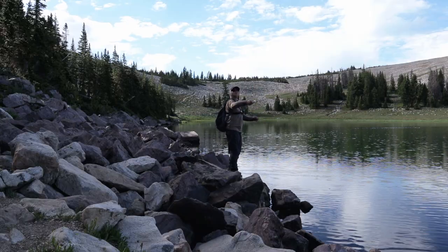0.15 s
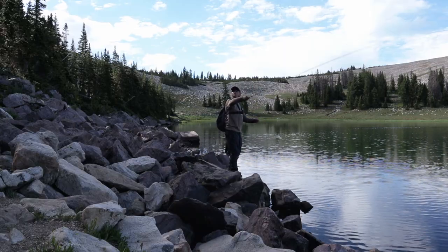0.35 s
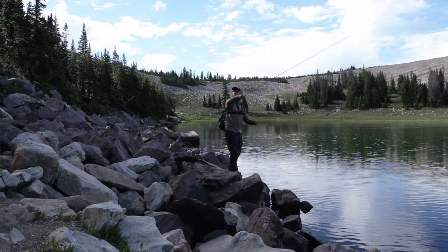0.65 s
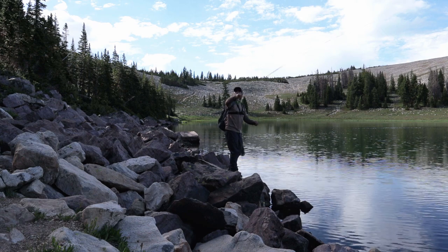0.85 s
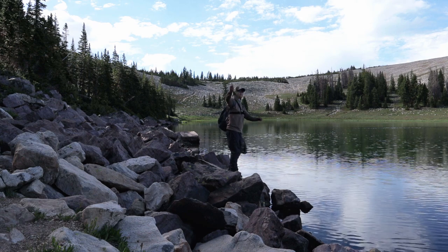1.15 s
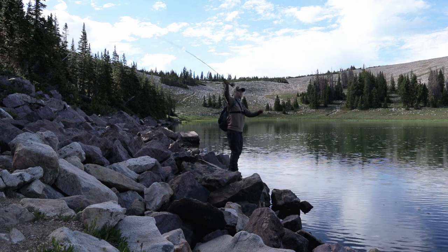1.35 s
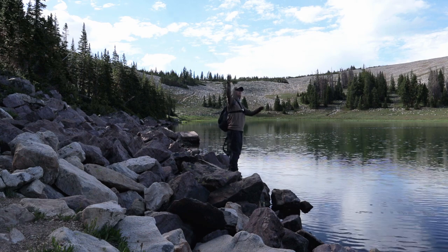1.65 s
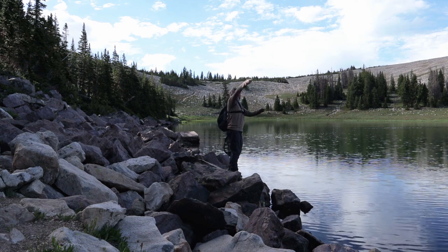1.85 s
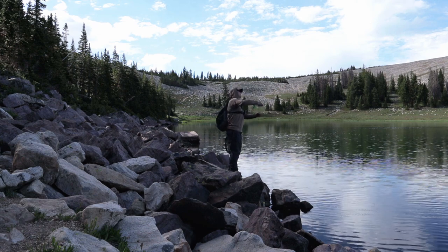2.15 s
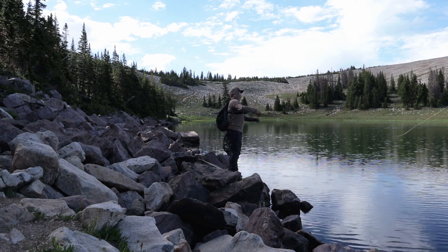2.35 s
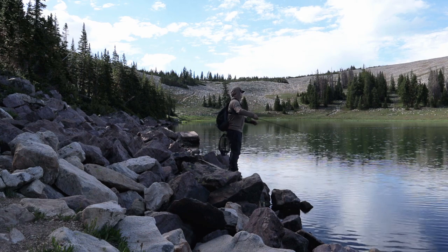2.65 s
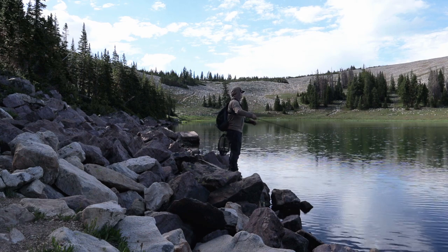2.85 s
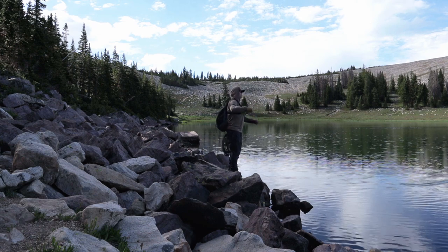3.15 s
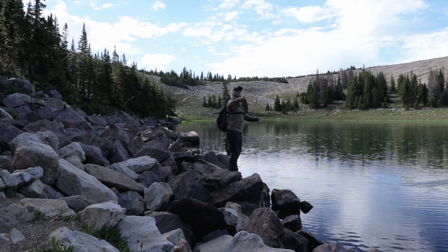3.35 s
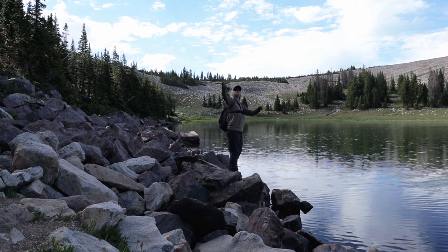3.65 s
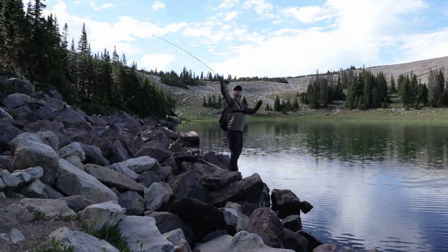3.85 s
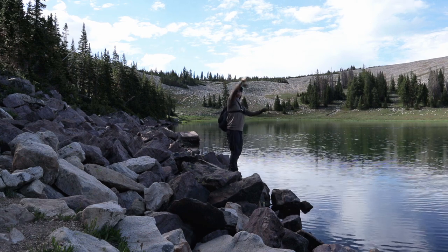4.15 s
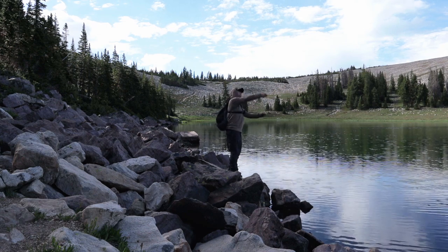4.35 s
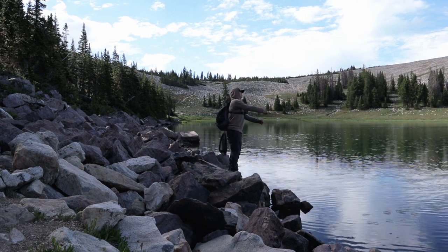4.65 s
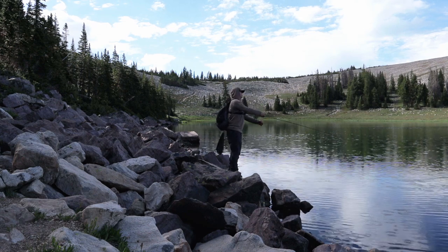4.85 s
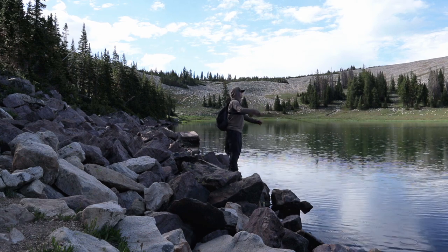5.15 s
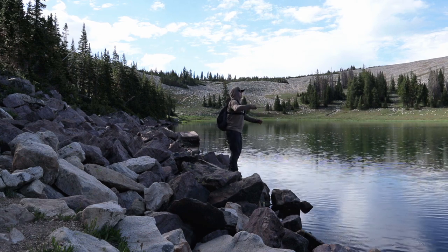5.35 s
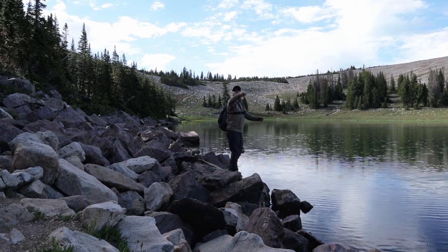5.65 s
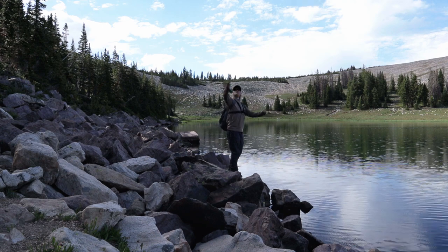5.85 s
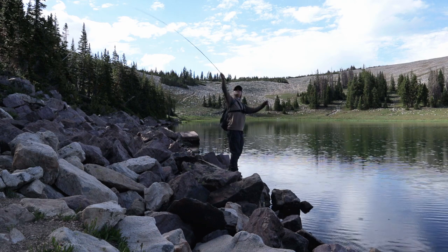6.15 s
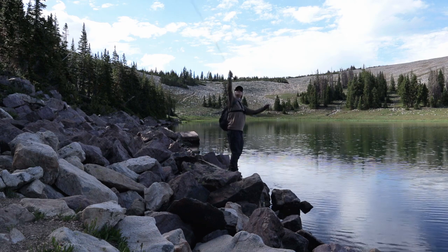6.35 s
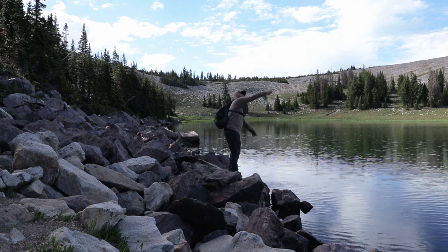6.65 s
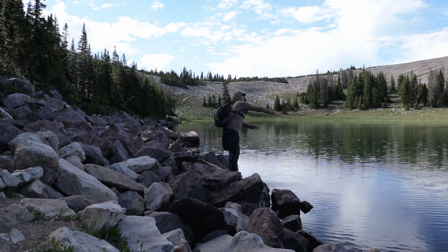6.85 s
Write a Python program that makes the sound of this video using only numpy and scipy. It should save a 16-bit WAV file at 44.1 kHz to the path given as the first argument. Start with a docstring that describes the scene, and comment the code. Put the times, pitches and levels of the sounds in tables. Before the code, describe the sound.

A close, dry outdoor sound of fly casting beside a still lake, with a low steady hush and faint wind buffets. A bird trills faintly until 0.4 s as a swish and soft line hiss pass, with tiny plops. From 1.0 to 1.4 s the ribbed line zips with a rising, then falling whine; a hissy swish and rattling ticks follow around 1.5-1.7. Ticks at 1.9-2.1 lead into two wavering zips until 2.6, then sparse ticks and small plops. A low knock at 3.3 starts a loud, bright zip climbing until 3.7, with a short tail. From 4.3 to 5.2 a swish carries thin, high, fluttering zips that slide downward. A rising zip at 5.6-5.85 precedes a sharp, jittery one at 5.95-6.15. Crisp slaps crackle at 6.2-6.4, then a strong final whoosh and rushing line hiss at 6.8-7.0.

```python
"""Ribbed fly line zips through a rod's guides as it is hauled: gliding tones with harmonics, over friction
hiss. The line ticks on the rod (damped sines); the rod swishes (shaped noise, fuzzy gliding tones). Light wind
buffets the microphone (gusty low noise); water plops among rocks and one low knock (rising damped sines) sound
over the steady hush of lake and forest (shaped noise); a bird trills faintly (whistles)."""
import sys
import numpy as np
from scipy import signal
from scipy.fft import rfft, irfft, next_fast_len
from scipy.io import wavfile
from scipy.ndimage import uniform_filter1d, map_coordinates

SR = 44100
rng = np.random.default_rng(int(sys.argv[2]) if len(sys.argv) > 2 else 0)


def put_to_file(sound):
    """Save the sound as 16-bit audio at rate SR, in the file named by the first command-line argument."""
    columns = np.atleast_2d(sound).T  # one column per channel
    safe = np.clip(columns, -1, 1)
    whole_steps = np.round(safe * 32767)
    wavfile.write(sys.argv[1], SR, whole_steps.astype(np.int16))


N = 309444


def amp(db):
    """Gain of a level in dB."""
    return 10 ** (np.asarray(db) / 20)


def unit(x):
    """x at rms 1."""
    return x / np.sqrt(np.mean(x ** 2) + 1e-20)


def wobble(rate_hz, size=N):
    """Smooth random curve with rate_hz knots a second."""
    knots = rng.standard_normal(size // 32 + 4)
    return map_coordinates(knots, [np.arange(size) * rate_hz / SR])


def filtered(x, response):
    """x times a response of frequency in Hz."""
    m = next_fast_len(N + 8192)
    return irfft(rfft(x, m) * response(np.fft.rfftfreq(m, 1 / SR)), m)[..., :N]


def noise(spectrum, patchy_db, grit_db):
    """Coloured noise of rms 1 with fast lumps and time-frequency patches of random gain."""
    gritty = rng.standard_normal(N) * amp(grit_db * wobble(400))
    z = signal.stft(gritty, nperseg=512)[2]
    field = uniform_filter1d(rng.standard_normal(z.shape), 5, 0)
    field = uniform_filter1d(field, 6, 1)
    x = signal.istft(z * amp(patchy_db * unit(field)), nperseg=512)[1][:N]
    f, db = np.transpose(spectrum)
    return unit(filtered(x, lambda hz: amp(np.interp(np.log(hz + 1), np.log(f + 1), db, -120, -120))))


def swells(events, base_db):
    """Gain over time: bell-shaped swells adding their power to a base level."""
    s, half_s, db = np.transpose(events)[:, :, None]
    t = np.arange(0, N, 32) / SR
    power = amp(db) ** 2 * np.exp(-((t - s) / half_s) ** 2 * 2)
    return np.repeat(np.sqrt(power.sum(0) + amp(base_db) ** 2), 32)[:N]


def pings(events, cycles, rise, crack, onset):
    """Damped sines gliding up, with a noise share; onset and decay constants are in cycles."""
    out, t = np.zeros(N + SR), np.arange(SR // 10) / SR
    for s, db, hz in events:
        ring = np.sin(2 * np.pi * hz * t * (1 + rise * hz * t))
        ring = ring + crack * rng.standard_normal(len(t))
        shape = ring * np.exp(-t * hz / cycles) * (1 - np.exp(-t * hz / onset))
        out[round(s * SR):][:len(t)] += amp(db) * shape / np.abs(shape).max()
    return out[:N]


def wind():
    """Lumpy pressure on the microphone: deep buffets and a quicker flutter, each in gusts."""
    # Relative spectra. Each row: frequency in Hz, density in dB per Hz.
    buffet_spectrum = [(8.8, -79), (15, 3.5), (35, 0), (120, -19), (160, -22.5), (260, -120)]
    flutter_spectrum = [(65, -31), (110, -8.5), (157, 9), (225, 3), (340, -3), (500, -6), (650, -10),
                        (1100, -120)]
    # Gusts. Each row: peak in seconds, half length in seconds, level in dB.
    buffet_gusts = [(0, 0.3, -72), (.55, 0.18, -59.5), (.75, 0.022, -65), (.925, 0.023, -40),
                    (1.05, 0.15, -60), (1.43, 0.071, -45.5), (1.65, .08, -61.5), (2.04, 0.053, -53.5),
                    (3.13, 0.024, -60), (2.4, 0.12, -79), (4.0, 0.082, -62), (4.23, 0.017, -53.5),
                    (4.36, .05, -58), (5.92, 0.075, -57), (6.0, .06, -43), (6.12, 0.11, -56.5),
                    (6.3, 0.12, -58), (6.77, 0.084, -47), (6.92, 0.071, -53)]
    flutter_gusts = [(.265, 0.019, -57.5), (.35, 0.05, -57.5), (.5, 0.31, -63.5), (.72, 0.055, -53),
                     (.925, 0.017, -59.5), (1.46, 0.087, -63.5), (1.65, 0.075, -56.5), (2.04, 0.15, -69),
                     (3.36, .05, -60), (3.7, 0.072, -73), (3.95, 0.059, -67), (4.38, 0.053, -58.5),
                     (4.55, 0.18, -66), (5.62, 0.045, -59.5), (5.93, 0.018, -71), (6.28, 0.23, -64),
                     (6.88, 0.25, -58)]
    lull_db, stir_db = -75.5, -75.5  # buffet and flutter between gusts
    buffet = unit(amp(4.2 * wobble(9.8)) * noise(buffet_spectrum, patchy_db=-2.5, grit_db=-1.0))
    flutter = unit(amp(3.5 * wobble(25)) * noise(flutter_spectrum, patchy_db=2.0, grit_db=3.0))
    return swells(buffet_gusts, lull_db) * buffet + swells(flutter_gusts, stir_db) * flutter


def lake():
    """Steady hush of lake and forest as shaped noise; plops and a knock as rising damped sines."""
    # Relative spectrum of the hush. Each row: frequency in Hz, density in dB per Hz.
    hush_spectrum = [(59, -26), (100, -13), (218, 7.5), (564, -25), (758, 8), (1130, -18), (1400, -0.5),
                     (3390, -29), (5870, 5), (8410, -33), (9740, -18), (13400, -24), (15500, -80)]
    # Plops among the rocks, and a low knock near 3.33 s.
    # Each row: start in seconds, peak in dB, starting pitch in Hz.
    plops_and_knock = [(0.24, -48, 232), (0.278, -54.5, 270), (0.709, -49, 220), (2.78, -55.5, 1250),
                       (2.936, -59.5, 1080), (3.144, -62, 680), (3.331, -39, 568), (3.338, -40.5, 770),
                       (3.362, -45.5, 740), (4.572, -52, 225), (6.451, -51, 1420)]
    hush_db = -74.5
    hush = amp(hush_db) * noise(hush_spectrum, patchy_db=1.4, grit_db=.6)
    return hush + pings(plops_and_knock, cycles=3.7, rise=0.0032, crack=0.0082, onset=0.35)


def swish():
    """Broad turbulence of the rod, plus vortices shed by the rod itself: fuzzy tones that glide."""
    # Vortex tones. Each row: start, end in seconds, level in dB before gain and fuzz, from Hz, to Hz.
    shedding = [(.36, 0.53, -57, 1600, 1306), (3.827, 3.949, -59, 1320, 1980),
                (3.98, 4.113, -61.5, 1900, 2260), (6.147, 6.268, -56, 1400, 2190),
                (6.305, 6.455, -57, 1787, 1726), (6.837, 7.036, -52, 2110, 1890)]
    # Rod strokes. Each row: fastest at seconds, half length in seconds, level in dB before gain.
    strokes = [(.45, 0.21, -61), (.28, 0.036, -67.5), (.67, 0.069, -62.5), (.92, 0.25, -70),
               (1.6, 0.16, -61), (2.0, .15, -62.5), (2.35, 0.27, -68), (3.36, 0.056, -59.5),
               (3.7, 0.58, -67.5), (4.4, 0.09, -60), (4.64, 0.12, -57.5), (5.1, 0.63, -69.5),
               (5.8, 0.1, -64), (6.25, 0.68, -68), (6.86, 0.19, -55.5)]
    # Relative spectrum of the turbulence. Each row: frequency in Hz, density in dB per Hz.
    air_spectrum = [(210, -1.5), (350, -5), (656, -5), (746, -1), (2490, -1), (3850, -5.5), (6110, -12.5),
                    (7500, -24), (9750, -46), (16500, -120)]
    calm_db = -78.5  # between strokes, before gain
    rod_gain_db, shed_gain_db = 4.5, 2
    t, fuzz, tone = np.arange(N) / SR, unit(wobble(1100)), 0
    for start, end, db, from_hz, to_hz in shedding:
        u = np.clip((t - start) / (end - start), 0, 1)
        turns = np.cumsum(from_hz + (to_hz - from_hz) * u) / SR
        tone = tone + amp(db + shed_gain_db) * np.sin(np.pi * u) ** 0.23 * np.sin(2 * np.pi * turns)
    rod = swells(strokes, calm_db) * noise(air_spectrum, patchy_db=3.0, grit_db=2.0)
    return amp(rod_gain_db) * rod + fuzz * tone


def rubbing():
    """Gritty friction noise ringing in the small steel guides: each slide rises, drifts and dies."""
    # Slides of the line. Each row: start in seconds, end in seconds, hiss at start and at end in dB
    # before grip, rise in seconds, bright edge in dB against hiss.
    slides = [(0.295, 0.7, -44.5, -62.5, 0.24, -16), (0.822, .89, -64.5, -74, .01, -36),
              (0.97, 1.255, -52.5, -48.5, 0.024, -24), (1.237, 1.396, -50, -53, 0.028, -15),
              (1.484, 1.643, -36.5, -51.5, 0.13, -12.5), (1.879, 1.948, -47.5, -52.5, 0.0096, -8.5),
              (1.962, 2.037, -48, -56, 0.015, -4.5), (2.018, 2.279, -48, -47.5, 0.049, -10.5),
              (2.27, 2.642, -49.5, -53, .03, -16), (3.349, 3.488, -48, -42, 0.056, -25),
              (3.443, 3.693, -47.5, -46.5, 0.013, -5), (3.704, 3.87, -54.5, -52.5, 0.018, -13),
              (3.855, 4.105, -63, -62, .02, -11), (4.23, 4.64, -60, -50, 0.06, -10.5),
              (4.634, 4.826, -48.5, -57, 0.026, -10.5), (4.822, 5.316, -50, -56, 0.012, -16.5),
              (5.464, 5.73, -57.5, -45, 0.072, -31), (5.656, 5.854, -49, -42, 0.018, -16.5),
              (5.939, 6.164, -48, -48.5, 0.024, -15.5), (6.163, 6.435, -56, -65, 0.038, -13),
              (6.427, 6.81, -65.5, -62.5, 0.023, -12.5), (6.796, 7.044, -36, -54.5, 0.18, -9.5)]
    # Relative spectra. Each row: frequency in Hz, density in dB per Hz.
    hiss_spectrum = [(1180, -25), (2000, -19.5), (4070, -4.5), (4390, -7.5), (4680, -4.5), (5900, -1.5),
                     (6290, -3), (7360, -16.5), (9000, -29), (11700, -75), (19800, -120)]
    edge_spectrum = [(4590, -33.5), (7800, -15.5), (8880, -20), (9960, -20.5), (11400, -39), (14300, -41),
                     (15500, -55)]
    ring_spectrum = [(3600, -43), (4500, -28.5), (5300, 1), (6000, 0), (6700, 8.5), (7200, -26),
                     (8000, -71)]
    lift_s, slack_db = 0.041, -73  # dying time scale as the line lifts; slack-line hiss before grip
    ring_db, ring_grows = -43.5, 2.3  # ringing equals hiss at this level and grows faster, dB per dB
    t = np.arange(N) / SR
    hiss_power, edge_power = amp(2 * slack_db), amp(2 * (slack_db - 12.5))
    for start, end, from_db, to_db, rise_s, edge_db in slides:
        rising = np.clip(1 - (t - start) / rise_s, 0, 9)
        dying = np.clip((t - end) / lift_s, 0, 9) ** 0.82
        level_db = np.interp(t, [start, end], [from_db, to_db]) - 25 * (rising + dying)
        power = amp(2 * level_db)
        hiss_power = hiss_power + power
        edge_power = edge_power + power * amp(2 * edge_db)
    grip = amp(1.5 * wobble(40) + 1.2 * wobble(12))
    ring_gain = amp(ring_db) * (hiss_power / amp(2 * ring_db)) ** (ring_grows / 2)
    ring = ring_gain * noise(ring_spectrum, patchy_db=0.5, grit_db=3)
    hiss = np.sqrt(hiss_power) * noise(hiss_spectrum, patchy_db=2, grit_db=2.5)
    edge = np.sqrt(edge_power) * noise(edge_spectrum, patchy_db=2, grit_db=2.5)
    return grip * (ring + hiss + edge)


def bird():
    """Trill: each note is a falling whistle, then a lower, nearly steady one."""
    # Trill notes. Each row: start in seconds, level in dB.
    trill = [(.004, -66), (.082, -64.5), (0.16, -64), (0.241, -63.5), (.322, -63)]
    # Parts of a note. Each row: start in seconds, length in seconds, from Hz, to Hz.
    note_parts = [(0, 0.017, 5050, 4280), (0.02, 0.028, 3820, 3650)]
    out = np.zeros(N)
    for s, db in trill:
        for start, length_s, from_hz, to_hz in note_parts:
            u = np.arange(round(length_s * SR)) / (length_s * SR)
            tone = np.sin(2 * np.pi * np.cumsum(from_hz + (to_hz - from_hz) * u) / SR)
            out[round((s + start) * SR):][:len(u)] += amp(db) * np.sin(np.pi * u) ** 0.71 * tone
    return out


def ticks():
    """Dry slaps of the line on the rod, each with a short scattered answer from the rocks."""
    # Slaps. Each row: start in seconds, peak in dB before filter and gain, pitch in Hz.
    single_slaps = [(0.237, -54, 1798), (0.2828, -57, 2540), (0.3154, -50, 2760), (0.3523, -37.5, 2620),
                    (0.571, -51, 4970), (0.675, -61, 3000), (0.7028, -50, 4500), (0.833, -52, 4660),
                    (1.6598, -27, 5340), (1.8946, -28, 5000), (1.9297, -30, 4100), (1.9394, -35, 4700),
                    (1.9694, -37, 6100), (1.9818, -44, 6500), (2.011, -35, 5160), (2.0936, -47, 6430),
                    (2.662, -39.5, 5900), (2.6888, -47, 6500), (2.7322, -47, 6770), (2.7493, -33.5, 5800),
                    (2.8363, -46, 6700), (2.86, -42, 5800), (3.331, -38.5, 1780), (3.352, -50, 1400),
                    (4.2273, -44.5, 3800), (4.6406, -49, 4430), (5.9396, -35, 6340), (6.22, -37, 2260),
                    (6.2402, -34, 5170), (6.2662, -31, 4930), (6.2767, -38, 4150), (6.3131, -24, 5660),
                    (6.3338, -29.5, 5130), (6.3818, -23.5, 6060), (6.408, -25.5, 4900), (6.6, -54, 5600),
                    (6.635, -46, 5970), (6.7342, -31.5, 4220)]
    # A run of quick slaps: first and last in seconds, before jitter.
    rattle_span_s = (1.556, 1.643)
    rattle_db, rattle_hz = -33, 5200  # centres of the random spread, before filter and gain
    u = rng.uniform(-1, 1, size=(14, 3))
    rattle_s = np.linspace(*rattle_span_s, len(u)) + .003 * u[:, 0]
    rattle = zip(rattle_s, rattle_db + 5 * u[:, 1], rattle_hz * (1 + .15 * u[:, 2]))
    slaps = pings([*single_slaps, *rattle], cycles=1.5, rise=.001, crack=.8, onset=0.2)
    t = np.arange(SR // 100) / SR
    scatter = amp(-19 - 60 * t / .03) * rng.standard_normal(len(t))
    slaps = filtered(slaps, lambda hz: hz ** 2 / (hz ** 2 + 1500 ** 2) / (1 + (hz / 7200) ** 8))
    return amp(6) * slaps + signal.fftconvolve(slaps, scatter)[:N]


def zips():
    """Ribs strike the guides at a rate set by sliding speed: a gliding tone with harmonics."""
    # One table per zip or part of a zip. Each row: time in seconds, rib rate in Hz, pressure on the
    # guides in dB before bounce and guide colour, overtones in dB against the rib tone.
    zip_parts = [
        [(0.985, 1685, -51, -2), (1.02, 1880, -46.5, 5), (1.05, 1680, -59, 15), (1.1, 2050, -41, -11),
         (1.135, 1900, -48, -3), (1.165, 1800, -41, -9), (1.23, 2205, -45, 3), (1.27, 2600, -43.5, 2),
         (1.3, 2980, -45.5, 11.5), (1.335, 3170, -48.5, 5.5), (1.375, 2850, -39, -14), (1.395, 2550, -45, -23),
         (1.42, 1700, -44, -12)],
        [(1.3, 9400, -72, -17), (1.345, 10300, -48, -15), (1.38, 8600, -52, -10), (1.43, 3500, -56.5, -2)],
        [(2.06, 1600, -58, -14), (2.1, 2140, -62, 1), (2.13, 1670, -48, 3), (2.15, 2475, -40, 1),
         (2.17, 3080, -43.5, 2), (2.21, 3624, -44, -5), (2.25, 2565, -37, -3), (2.27, 2510, -36, -10),
         (2.285, 1950, -43, 1), (2.33, 1870, -52, 8)],
        [(2.37, 1917, -53, 6), (2.4, 2777, -43, -13), (2.43, 2570, -35, -9), (2.455, 2730, -40, -8),
         (2.475, 3280, -45, -6), (2.503, 3240, -43, -8), (2.53, 2180, -39, -8), (2.56, 1970, -51, 17),
         (2.6, 1760, -54, 8.5), (2.63, 1640, -51, 7)],
        [(3.4, 1155, -66, -28), (3.42, 1513, -31, -0.5), (3.45, 2230, -33, -0.5), (3.48, 2890, -29.5, 5.5),
         (3.5, 3440, -22, 1.5), (3.522, 3790, -22, 0), (3.552, 3220, -34, 12.5), (3.59, 4450, -29.5, 5),
         (3.612, 4340, -30.5, 1.5), (3.64, 5140, -36, 8), (3.668, 5150, -38, 2), (3.68, 4700, -28, 1),
         (3.697, 2790, -42.5, 0.5)],
        [(3.733, 3110, -40, -6), (3.742, 4470, -34.5, -13), (3.76, 2990, -43.5, -1), (3.775, 3500, -36.5, -4),
         (3.79, 3100, -46, -4), (3.83, 3040, -46, -5), (3.845, 2560, -45.5, 3), (3.87, 1750, -44, 0)],
        [(4.28, 1997, -56, 1), (4.31, 3830, -43, -24), (4.335, 5880, -43.5, -11), (4.355, 4810, -49, -14),
         (4.38, 6920, -55, -15), (4.405, 4900, -40.5, -14), (4.435, 3960, -47, -8), (4.475, 8800, -42, -10),
         (4.495, 9800, -40, -15), (4.52, 9000, -49, -15)],
        [(4.53, 7800, -40.5, -15), (4.55, 6600, -38, -15), (4.59, 8800, -46, -15), (4.62, 7600, -36.5, -15),
         (4.66, 6800, -52, -10), (4.69, 8000, -39.5, -15), (4.73, 6950, -46.5, -15), (4.81, 6900, -52.5, -15)],
        [(4.825, 5940, -45.5, -15), (4.85, 5680, -41.5, -7), (4.9, 4660, -49, -13), (4.92, 4810, -44, -6),
         (4.94, 4620, -39, -26), (4.98, 3995, -47, -1), (5.02, 3640, -40, -22), (5.06, 2944, -41.5, -9.5),
         (5.1, 2300, -38, -13), (5.15, 1596, -47, -1), (5.21, 1450, -43.5, -3.5)],
        [(5.6, 1156, -38, -16), (5.64, 1366, -38, -8), (5.665, 1120, -42, -9), (5.7, 1370, -47, 15),
         (5.74, 1670, -48, 3), (5.78, 2100, -41, 13), (5.8, 2350, -51, 10), (5.82, 2665, -36, 13),
         (5.835, 2500, -32, -2), (5.862, 1340, -37, -8)],
        [(5.96, 1850, -38, -12), (5.975, 3350, -27.5, 2), (5.993, 2540, -42.5, -1), (6.01, 3500, -22, -9),
         (6.03, 3290, -42, -2), (6.037, 4480, -34.5, -7), (6.048, 3400, -34.5, -12), (6.057, 4060, -32, -6),
         (6.073, 4420, -33, -14), (6.085, 3260, -39, -3), (6.098, 4620, -29, -15), (6.118, 2940, -41, -5),
         (6.131, 4060, -38.5, -2), (6.152, 1820, -30.5, -19), (6.167, 2200, -36, -12)],
        [(6.8, 2870, -41, -23), (6.83, 2600, -43, -25), (6.85, 3530, -35.5, -22), (6.865, 4930, -41.5, -7),
         (6.89, 5000, -39.5, -13), (6.91, 6000, -52, -15), (6.94, 5770, -41, -12), (6.97, 5550, -48.5, 1),
         (7.012, 6100, -56, -13)],
    ]
    # Weave tone, second strand of line and harmonics, before guide colour. Each row, one zip or part:
    # dB at 1.5 (weave) and 1.72 (second strand) times the rib rate against the rib tone,
    # dB at 3 and 4 times against the octave.
    side_tones = [(-14, -4, 0, -31), (-30, -30, -30, -30), (-19, -9, -17, -12), (-23, -22, -10.5, -11),
                  (-43, -20, -3, -7), (-23, -30, -24, -28), (-14, -25, -20, -20), (-30, -30, -30, -41),
                  (-25, -25, -12, -21), (-22, -17, -3, -18), (-25, -29, -22, -25), (-24, -31, -25, -31)]
    # How much the line lifts off the guides: one value in dB per zip or part.
    bounce = [2, 2, 3.5, 3, 1.5, 3, 3, 5, 4.5, 1.2, 2.5, 6]
    # Multiples of the rib rate: ribs, octave, a weave tone at 1.5, a second strand of line at 1.72,
    # two higher harmonics.
    multiples = (1, 2, 1.5, 1.72, 3, 4)
    # How the guides pass a tone. Each row: frequency in Hz, gain in dB.
    guide = [(1100, -34.5), (2000, -22.5), (3000, -9), (4500, -7), (6000, 3), (7500, -7.5), (10000, -15),
             (12500, -33)]
    dull_hz, fade_s = 7130, 0.0039
    out, (f, guide_db) = np.zeros(N + SR), np.transpose(guide)
    for rows, side_db, bounce_db in zip(zip_parts, side_tones, bounce):
        s, *cols = np.transpose(rows)
        t = np.arange(s[0] - .006, s[-1] + 0.015, 1 / SR)
        size = len(t)
        hz, db, bright_db = [uniform_filter1d(np.interp(t, s, c), size=260) for c in cols]
        # a racing line skips over the guides
        skip = .0035 * bounce_db * (1 + .6 * (hz / 6000) ** 2)
        jitter = .7 * wobble(120, size) + 1.2 * wobble(700, size)
        turns = np.cumsum(hz * (1 + skip * jitter)) / SR
        fade = np.clip(np.minimum(t - t[0], t[-1] - t) / fade_s, 0, 1)
        for k, share_db in zip(multiples, (0, 0, *side_db)):
            # several guides sound at once and beat
            beat = 1 + .55 * wobble(200 + 80 * bounce_db, size)
            # contact drops out briefly
            press_db = bounce_db * max(1, k / 2) * (1 - 1.5 * np.abs(wobble(45, size)))
            colour_db = np.interp(np.log(k * hz), np.log(f), guide_db, right=-120)
            if k not in (1, 2):  # the weaker tones lose their treble
                colour_db -= 10 * np.log10(1 + (k * hz / dull_hz) ** 16)
            level_db = db + (k >= 2) * bright_db + share_db + colour_db + press_db
            tone = beat * np.sin(2 * np.pi * k * turns)
            out[round(t[0] * SR):][:size] += fade * amp(level_db) * tone
    return out[:N]


def scene():
    """All sources summed, one channel."""
    return (wind() + lake() + swish() + rubbing() + bird() + ticks() + zips())[None]


def record(dry):
    """The converter mirrors treble faintly above half its sample rate; a band limit cuts the top."""
    mirror_hz, image_db, top_hz = 12000, -27, 15870  # mirror_hz: half the converter's sample rate
    z, edge = rfft(dry), round(mirror_hz * N / SR)
    image = np.pad(np.conj(z[:, edge:edge // 2:-1]), ((0, 0), (edge, 0)))
    return filtered(dry + amp(image_db) * irfft(image, N), lambda hz: hz < top_hz)


dry = scene()
out = record(dry)
put_to_file(out)
```